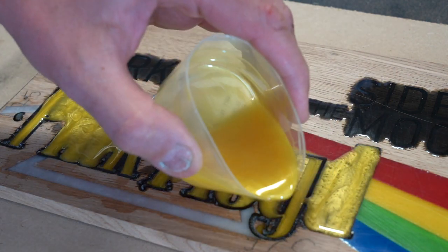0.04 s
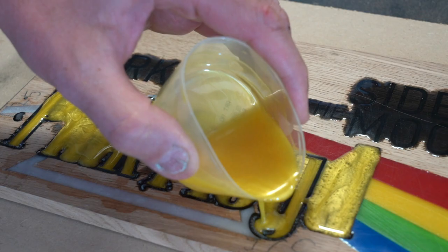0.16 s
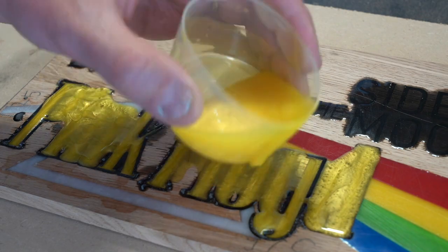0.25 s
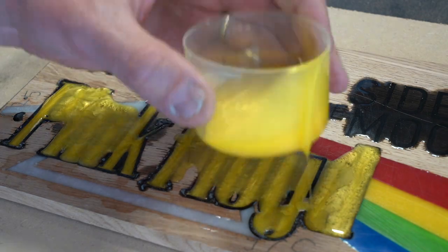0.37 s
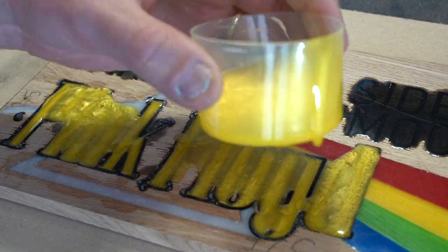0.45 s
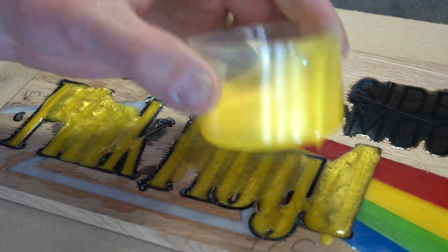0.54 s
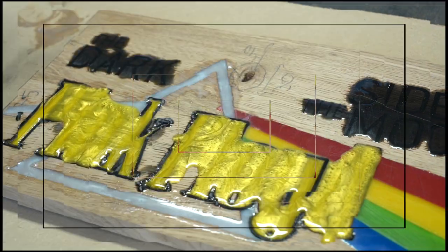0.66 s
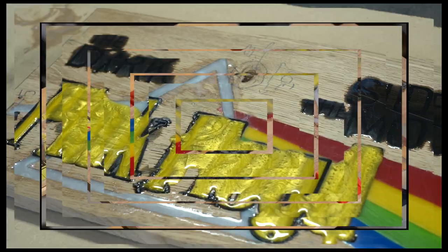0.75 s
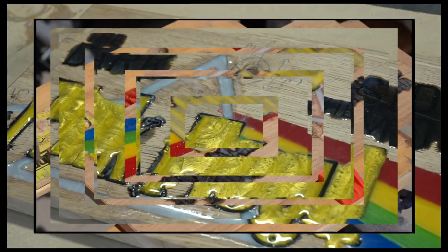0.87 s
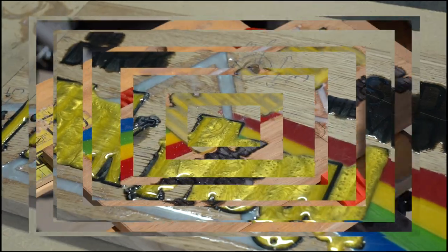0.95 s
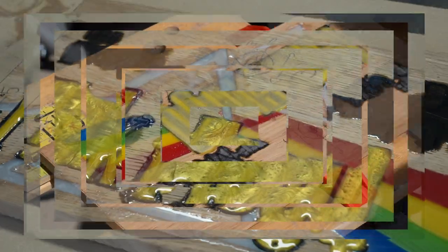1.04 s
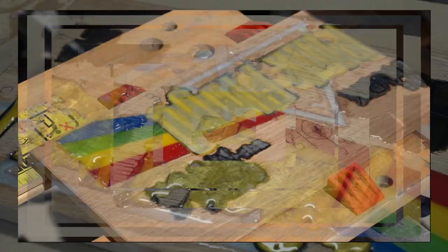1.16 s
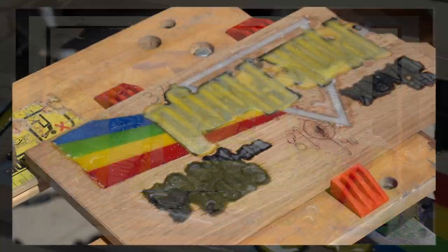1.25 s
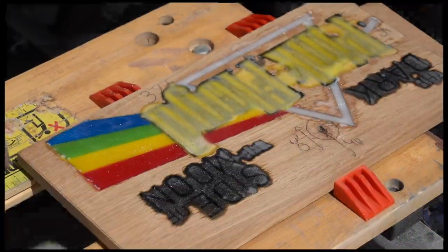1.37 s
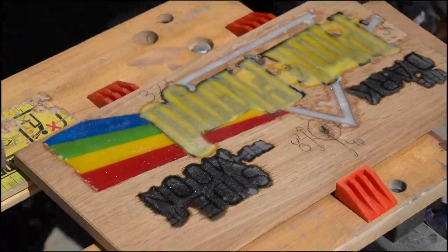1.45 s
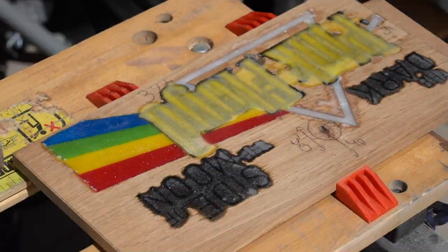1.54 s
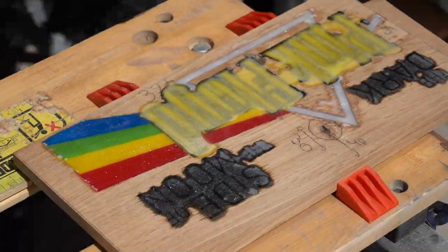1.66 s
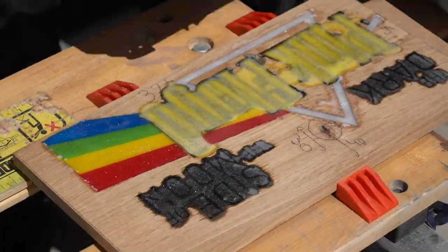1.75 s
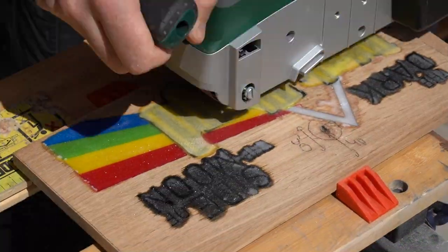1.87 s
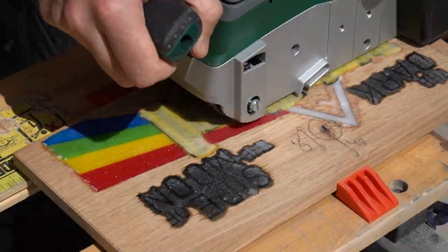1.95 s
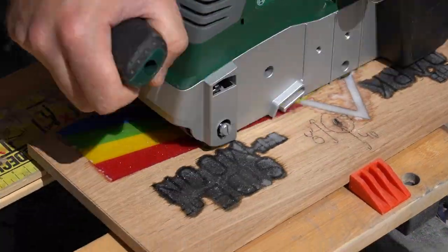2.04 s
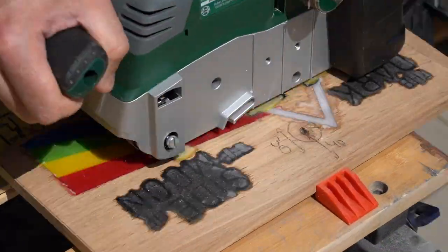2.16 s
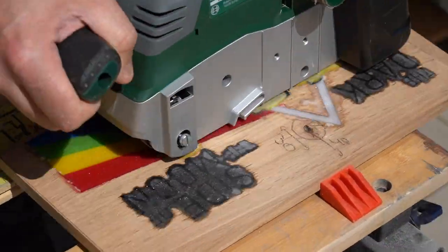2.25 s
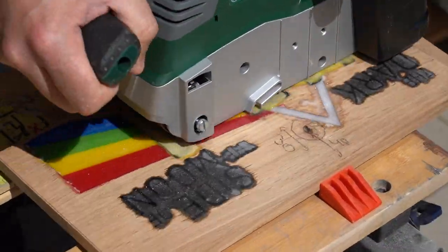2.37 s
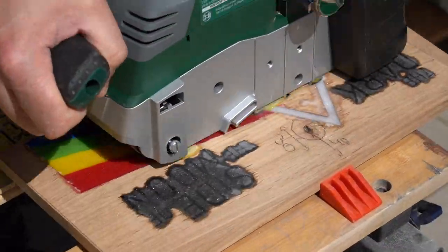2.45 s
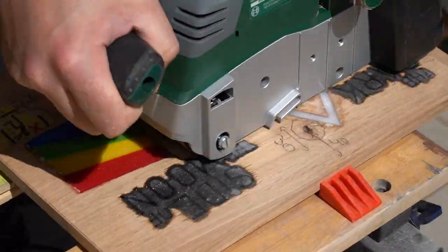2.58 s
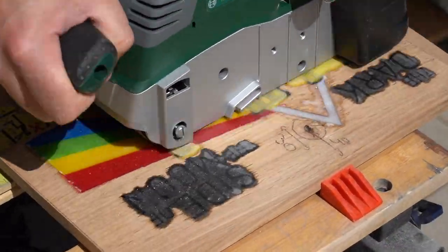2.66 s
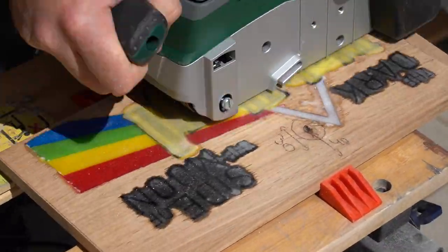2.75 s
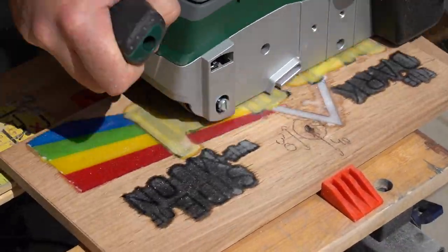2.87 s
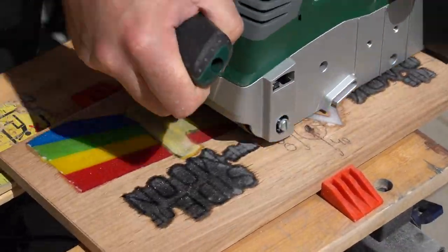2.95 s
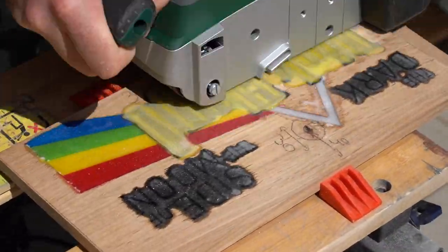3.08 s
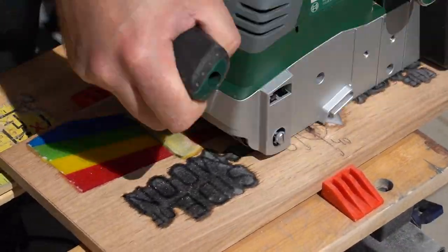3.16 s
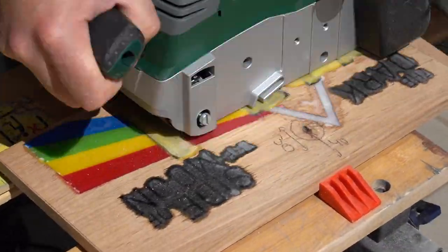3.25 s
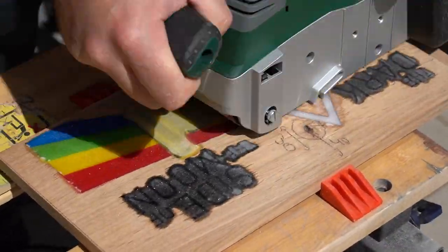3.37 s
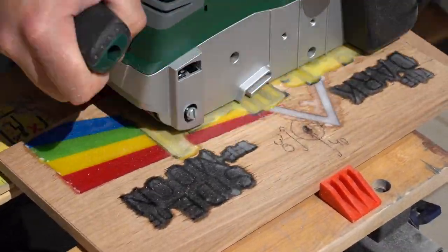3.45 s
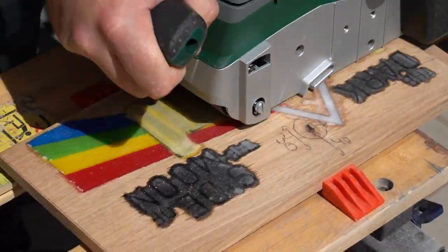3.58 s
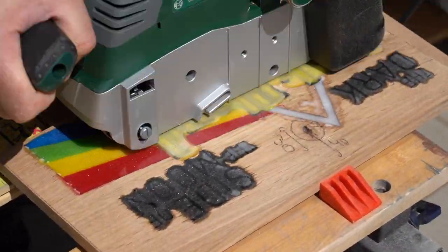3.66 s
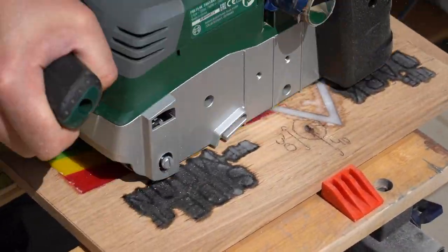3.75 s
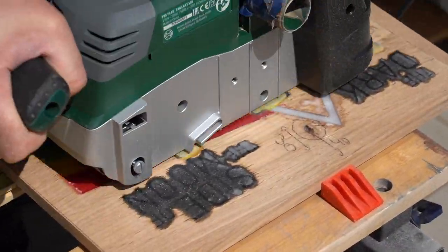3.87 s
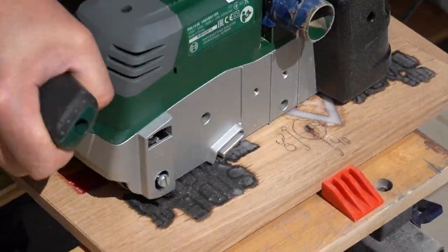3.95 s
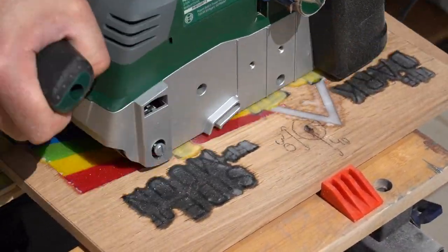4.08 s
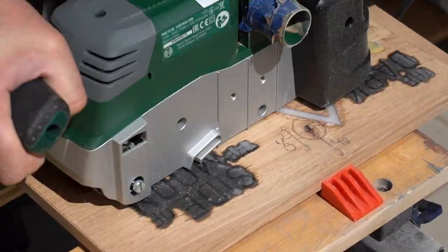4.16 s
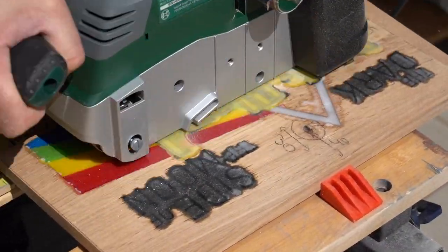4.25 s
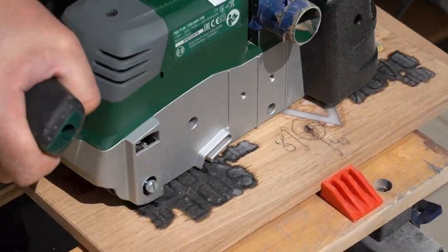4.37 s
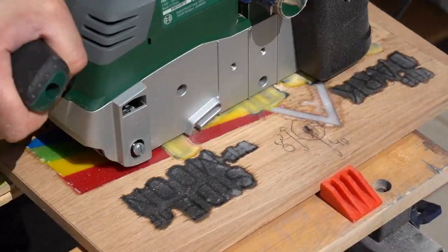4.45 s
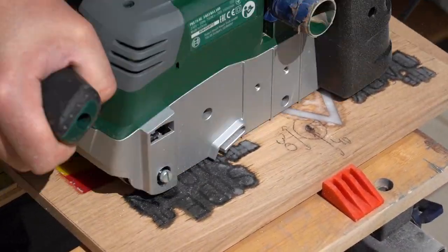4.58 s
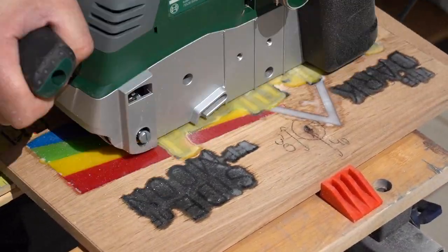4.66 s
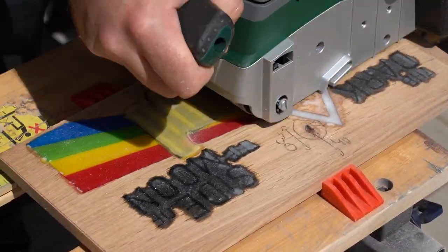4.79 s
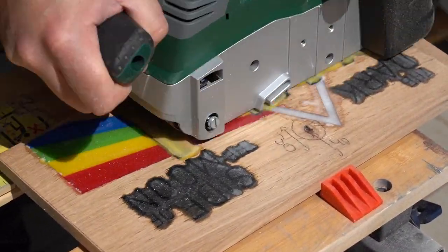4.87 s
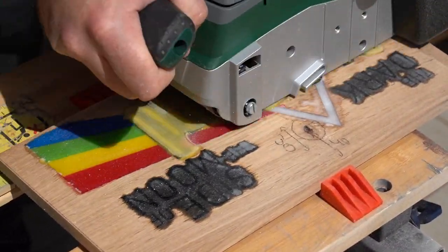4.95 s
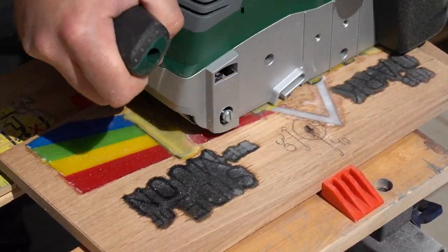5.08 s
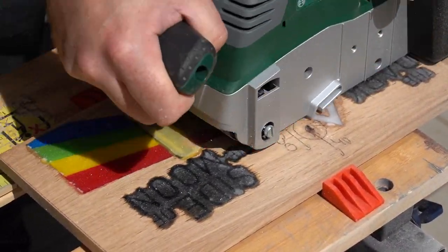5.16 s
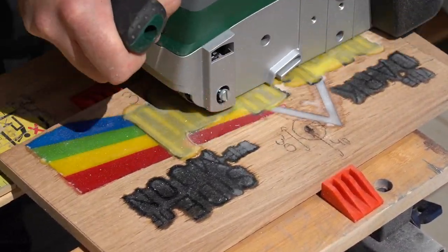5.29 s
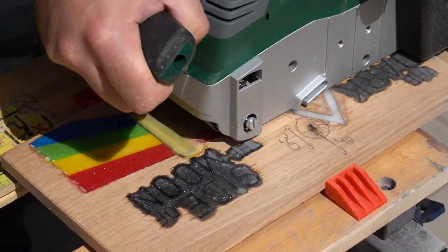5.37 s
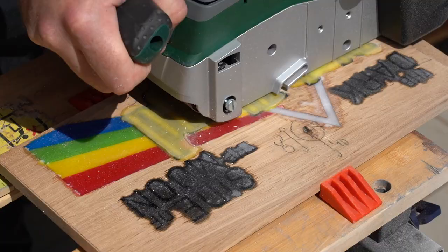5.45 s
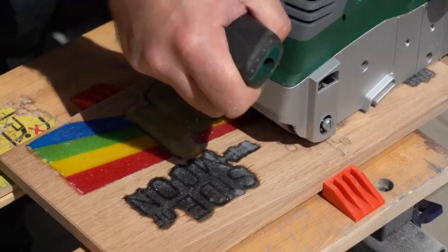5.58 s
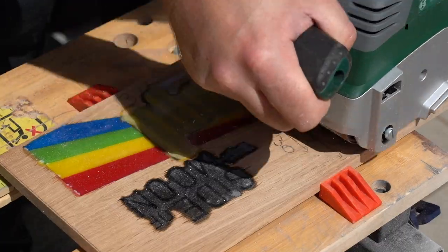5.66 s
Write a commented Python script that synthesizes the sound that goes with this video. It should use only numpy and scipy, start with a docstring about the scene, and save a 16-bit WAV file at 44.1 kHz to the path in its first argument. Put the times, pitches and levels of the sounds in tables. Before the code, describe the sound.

A fan drone with thin electric whine fades out, then a belt sander jerks to life and grinds a resin-filled board with a wavering whine.

```python
"""A belt sander spins up on a resin-filled wooden board: its fan whines as multiples of the motor's
turn rate, which sags under load, while banded noise hisses as grit on the wood.
Before it a fan drones (resonant noise) with a thin electric whine (fixed lines) and fades away;
soft bumps ring bench modes, hiss swells make short swishes and a gliding sine squeaks.
Faint air noise and a low hum lie beneath."""
import sys
import numpy as np
from scipy import signal
from scipy.io import wavfile

SR = 44100
rng = np.random.default_rng(int(sys.argv[2]) if len(sys.argv) > 2 else 0)


def dump(signal):
    """Clip the signal to [-1, 1] and save it as 16-bit WAV at the path in sys.argv[1]."""
    limited = np.clip(np.atleast_2d(signal).T, -1, 1)
    pcm = np.round(limited * 32767).astype(np.int16)
    wavfile.write(sys.argv[1], SR, pcm)


N = 252252
TIME_S = np.arange(N) / SR

# Drone air spectrum, relative: f/Hz, density/dB per Hz
DRONE_AIR = [(30, -15), (65, -5.5), (150, -10), (235, -5.5), (380, -8), (600, -11), (800, -11.5),
             (1100, -12.5), (1700, -15.5), (2300, -15), (5000, -19.5), (9500, -26), (12800, -30.5),
             (15800, -51)]
# Fan and duct resonances, two passes each: f/Hz, half of each pass's bandwidth/Hz, level re drone/dB
DUCT = [(91, 4.9, -14.5), (116.2, 3.4, -13.5), (199.3, 8.1, -20), (288, 18, -12.5), (312, 18, -9.5),
        (440, 15, -10.5), (523.5, 20, -14), (694.6, 28, -8.5), (735, 25, -12), (943, 17, -20),
        (2143, 41, -18.5), (2360, 85, -18.5)]
# Drone left-right correlation: f/Hz, likeness/1
DRONE_LIKENESS = [(60, .999), (200, 1), (350, 0.95), (600, 0.74), (950, 0.042), (1400, 0.11), (2200, -0.42),
                  (4200, -0.2), (5500, 0.062), (15000, 0)]
# Drone balance: f/Hz, left minus right/dB
DRONE_BALANCE = [(150, 0), (380, -1.5), (700, -4.5), (2400, 0), (6000, -2), (15000, -1)]
# Electric whine lines: f/Hz, relative level/dB
BUZZ = [(1200, -18), (1402, -6), (1798, -8), (1998, 1.5), (2799, -7)]
# Electric whine swells: start/s, end/s, level/dB
BUZZ_SWELLS = [(0, 0.35, -64), (.47, 0.62, -59.5)]
# Narrow hiss swells: start/s, end/s, level/dB
HISS_SWELLS = [(0.028, .105, -53), (0.447, 0.538, -56)]
# Room air spectrum, relative: f/Hz, density/dB per Hz
ROOM_AIR = [(40, -13), (150, -2), (500, -6.5), (2000, -9), (3000, -10.5), (6000, -7), (15000, -26)]
# Bumps on the bench: t/s, level/dB
KNOCKS = [(.802, -39), (.818, -40), (.849, -45.5), (1.509, -57), (1.644, -69)]
# Bench modes: f/Hz, relative level/dB, t60/s
BENCH = [(194, -8.5, 0.19), (315, -12, 0.09), (401, 2, 0.1), (494, 0, 0.063), (680, 5.5, 0.03),
         (1020, -4, 0.055), (1530, -6, 0.033), (2520, -25, .015)]
# Swish spectrum, relative: f/Hz, density/dB per Hz
SWISH = [(180, -45), (300, -3), (991, -15), (1570, -1), (1970, -3), (3790, -3.5), (6000, -7), (8880, -13),
         (15000, -20)]
# Swishes: start/s, attack/s, end/s, release/s, level/dB
SWISHES = [(1.04, .03, 1.11, .05, -65), (1.35, .03, 1.4, .02, -71), (1.514, 0.075, 1.627, 0.078, -57.5)]
# Squeak: t/s, f/Hz, level/dB
SQUEAK = [(1.677, 4800, -82), (1.684, 5200, -74), (1.692, 5500, -64), (1.718, 5560, -65),
          (1.733, 5300, -67), (1.742, 4700, -72), (1.7445, 5400, -86), (1.749, 5560, -66),
          (1.757, 5250, -67), (1.765, 4600, -76)]
# Motor run-up before the load: t/s, speed/turns per s
RUN_UP = [(1.77, 190), (1.8, 235), (1.837, 283), (1.875, 318), (1.9, 333), (1.97, 375), (2.05, 387),
          (2.09, 383), (2.12, 376), (2.16, 373), (2.21, 369)]
# Motor under the changing hand pressure: t/s, speed/turns per s
LOADED = [(2.245, 309), (2.28, 299), (2.34, 287), (2.42, 303), (2.48, 311), (2.55, 315), (2.68, 309),
          (2.82, 313), (2.9, 309), (2.99, 301), (3.17, 295), (3.27, 286), (3.42, 301), (3.62, 290),
          (3.73, 273), (3.81, 286), (3.88, 289), (4.06, 285), (4.17, 288), (4.4, 283), (4.57, 294),
          (4.69, 285), (4.8, 292), (5.0, 282), (5.12, 277), (5.31, 280), (5.5, 273), (5.72, 287)]
# Sanding noise spectrum, relative: f/Hz, density/dB per Hz
GRIT = [(40, -42), (80, -21.5), (110, -36), (170, -22), (220, -39), (300, -13.5), (500, -7.5), (1100, -5),
        (1700, -3), (3100, -2), (3700, -2.5), (7500, -6.5), (9500, -10), (15800, -17)]
# Housing and board resonances: f/Hz, bandwidth/Hz, gain/dB
HOUSING = [(327, 49, 1.5), (515, 310, -6), (1545, 340, -7.5), (2840, 690, -4.5), (5900, 2000, -28),
           (7870, 440, -14)]
# Sander left-right correlation: f/Hz, likeness/1
SANDER_LIKENESS = [(60, .999), (150, 1), (300, 1), (640, 0.98), (1400, 0.76), (3100, 0.55), (6800, 0.42),
                   (15000, 0.49)]
# Sander balance: f/Hz, left minus right/dB
SANDER_BALANCE = [(100, -0.5), (300, -1.5), (640, 0), (1400, -1), (4000, -1.3), (7500, -3.5), (15000, 1)]
# Belt briefly loses grip: t/s, 1/e half-length/s, noise dip/dB
SLIPS = [(1.845, .004, 2), (1.865, 0.003, 4), (2.216, 0.048, 2.5), (2.334, 0.072, 4), (3.264, 0.044, 1.5),
         (3.673, .04, 0.5), (5.044, 0.032, 1)]
# Drive jerks the belt into motion: t/s, 1/e half-length/s, level/dB
JERKS = [(1.775, .004, -53.5), (1.794, .004, -50), (1.805, .0035, -45), (1.8155, 0.004, -43),
         (1.827, .004, -47), (1.8372, .0035, -38.5), (1.856, 0.0048, -36.5), (1.875, 0.0055, -41),
         (1.895, .009, -45.5)]
# Rotor orders in each jerk: multiple of turn rate, relative level/dB
JERK_TONES = [(5, -16), (7, -13), (9, -10), (10, 0), (11, -10), (14, -17), (16, -17)]
# Grit crunches as the belt first drags: t/s, 1/e half-length/s, level/dB
CRUNCHES = [(1.83, 0.022, -59), (1.95, 0.046, -53), (2.1, 0.13, -57.5), (2.2, .05, -56)]
# Belt catches, board rasps louder: t/s, 1/e half-length/s, level/dB
CATCHES = [(2.36, 0.11, -50.5), (3.175, 0.02, -45.5), (3.78, 0.039, -49), (4.2, 0.26, -55.5),
           (4.675, 0.017, -50.5)]
# Dull board thumps: t/s, 1/e half-length/s, level/dB
THUMPS = [(2.88, 0.02, -69), (2.97, 0.036, -72), (3.13, 0.021, -69), (3.9, 0.049, -67), (4.15, 0.1, -70),
          (4.38, 0.024, -73)]
# Blade tone before throb: t/s, level/dB
BLADE_LEVEL = [(2.2, -75), (2.27, -54), (2.37, -61), (2.44, -50), (2.53, -46.5), (2.65, -44.5), (2.74, -52),
               (2.81, -51), (2.92, -45), (3.25, -45.5), (3.35, -47.5), (3.53, -45), (3.8, -45.5),
               (4.1, -48.5), (4.33, -49), (4.52, -46.5), (5.1, -45), (5.4, -47.5), (5.72, -48.5)]
# Blade octave before throb, sings out as the belt bites: t/s, level/dB
OCTAVE_LEVEL = [(2.22, -82), (2.265, -45.5), (2.335, -46), (2.36, -62), (2.42, -46.5), (2.6, -47),
                (2.67, -42.5), (2.82, -44.5), (2.92, -49), (3.06, -44.5), (3.26, -49.5), (3.46, -43),
                (3.7, -50), (3.82, -48), (4.15, -49), (4.28, -52.5), (4.6, -46.5), (4.72, -48),
                (4.82, -45.5), (4.97, -45.5), (5.08, -51), (5.2, -48), (5.33, -51), (5.52, -48.5),
                (5.64, -43.5), (5.72, -51)]
# Rotor hum: t/s, level/dB
HUM_LEVEL = [(2.2, -75), (2.27, -61), (2.37, -78), (2.48, -59), (2.72, -63.5), (3.05, -68), (3.25, -70),
             (3.35, -64), (3.55, -61.5), (3.7, -75.5), (4.6, -70), (5.72, -79)]
# Weaker tones under load: multiple of turn rate, entry/s, base level/dB,
# slope/dB per % of extra speed, flutter/1
MOTOR_TONES = [(5, 2.37, -63.5, .5, 0.57), (6, 2.37, -58.5, .5, 0.42), (8, 2.4, -58.5, 0, 0.48),
               (9, 2.4, -64.5, 0.85, 0.9), (10, 2.9, -56.5, -0.26, 0.52), (11, 3.72, -54.5, -0.1, 0.35),
               (21, 2.36, -53.5, 0, 0.6), (27, 3.7, -62.5, -1, 1.1), (28, 3.2, -62.5, -0.5, 1)]
# Single motor tones swell or sink for a moment: multiple of turn rate, t/s, 1/e half-length/s, change/dB
TONE_SWELLS = [(9, 2.5, .08, 4), (6, 4.53, 0.12, 3.5), (11, 4.92, 0.1, -12), (8, 4.4, 0.16, 8),
               (6, 5.4, .3, -7), (10, 5.45, 0.2, 6), (11, 5.5, 0.043, 4.5)]

BLADES = 7
ROLLER_RATIO = 0.156   # belt roller turns per motor turn
WORKING_SPEED_TURNS_PER_S = 290
TRIGGER_S, TRIGGER_RISE_S = 1.7695, 0.003
SETTLED_S, SETTLE_S = 2.37, 0.068   # belt settles on the board and begins to tug
DRONE_DB, DRONE_FADE_S, DRONE_GONE_S, DRONE_FADE_POWER = -41.5, 0.78, 1.516, 1.25
BUZZ_REST_DB, BUZZ_RAMP_S = -68.5, 0.02
# Abrasion layers: level/dB at working speed, slope/dB per % of extra speed, build-up/s
BOARD_RASP = (-42, 0.059, 0.051)
GRIT_SCRAPE = (-43, 0.026, 0.017)
DUST_HISS = (-41.5, 0.064, 0.085)
SCRAPE_DIP_SHARE = 0.36   # midrange dips less than rasp and hiss
FREE_BLADE_DB, FREE_HOARSE_DB, FREE_OCTAVE_DB, FREE_HUM_DB = -48, -49, -50, -58.5
JERK_SHUDDER_RAD, FREE_SHUDDER_RAD = 0.04, 0.035   # rotor angle wobble
BLADE_THROB, OCTAVE_THROB = 0.3, 0.19   # depth, about once per roller turn
TONE_WANDER_DB, TONE_WANDER_HZ = 0.8, 4
VENT_HZ, VENT_HALF_WIDTH_HZ, VENT_DB = 2983, 76, 5   # housing resonance lifting the weaker tones
PUSH_S, PUSH_HALF_S, PUSH_TONES_DB = 4.2, 0.87, 2   # pushed far forward, weaker tones stand out
CUTOFF_HZ = 15900


def from_db(db):
    """Decibels to gain."""
    return 10 ** (np.asarray(db) / 20)


def rms_one(x):
    """Scale to unit power."""
    return x / np.sqrt(np.mean(x ** 2) + 1e-20)


def in_time(rows):
    """Each column of a timed table at every sample."""
    t_s, *columns = np.transpose(rows)
    return [np.interp(TIME_S, t_s, column) for column in columns]


def at_hz(points, hz):
    """Read a spectrum on a log-frequency axis."""
    points = np.array(points)
    return np.interp(np.log(hz), np.log(points[:, 0]), points[:, 1])


def swell(start_s, attack_s, end_s, release_s):
    """Straight attack, hold until the end, straight release."""
    attack = np.clip((TIME_S - start_s) / attack_s, 0, 1)
    return attack * np.clip(1 - (TIME_S - end_s) / release_s, 0, 1)


def bump(t_s, half_s):
    """Gaussian rise and fall around a moment."""
    return np.exp(-((TIME_S - t_s) / half_s) ** 2)


def bursts(rows):
    """Summed level of a row of short bursts."""
    return sum(from_db(db) * bump(t_s, half_s) for t_s, half_s, db in rows)


def drift(rate_hz):
    """Random curve of RMS 1: noise through a double real pole at a low rate."""
    step = 20   # samples per drift point
    warm_up = 4000
    pole = np.exp(-2 * np.pi * rate_hz * step / SR)
    white = rng.standard_normal(N // step + 2 + warm_up)
    slow = signal.lfilter([1], [1, -2 * pole, pole * pole], white)[warm_up:]
    return np.interp(np.arange(N) / step, np.arange(len(slow)), rms_one(slow))


def resonate(x, hz, width_hz):
    """Two-pole resonance with gain 1 on top."""
    r = np.exp(-np.pi * width_hz / SR)
    numerator = np.array([1, 0, -1]) * (1 - r * r) / 2
    return signal.lfilter(numerator, [1, -2 * r * np.cos(2 * np.pi * hz / SR), r * r], x)


def resonate_twice(x, hz, width_hz):
    """Two equal resonances in series: steeper skirts."""
    return resonate(resonate(x, hz, width_hz), hz, width_hz)


def angle(hz):
    """Running phase of a changing rate."""
    return 2 * np.pi * np.cumsum(hz) / SR


def spread(pair, hz, likeness, balance):
    """Mix two unrelated signals into partly alike left and right."""
    alike = np.clip(at_hz(likeness, hz), -0.9, 0.999)
    sides = np.array([[1], [-1]])
    stereo = np.sqrt(1 + alike) * pair[0] + np.sqrt(1 - alike) * pair[1] * sides
    return stereo * from_db(sides * at_hz(balance, hz) / 2)


def noise_bands(spectrum, likeness, balance, count):
    """Stereo noise as (Hz, band) pairs, band powers summing to 1."""
    edges_hz = np.geomspace(30, 17000, count + 1)
    white = rng.standard_normal((2, 2, N))   # neighbouring bands use different noise
    bands = []
    for k, (low_hz, high_hz) in enumerate(zip(edges_hz, edges_hz[1:])):
        hz = np.sqrt(low_hz * high_hz)
        band_pass = signal.butter(2, [low_hz, high_hz], "band", fs=SR, output="sos")
        pair = signal.sosfilt(band_pass, white[k % 2])
        bands.append((hz, from_db(at_hz(spectrum, hz)) * spread(pair, hz, likeness, balance)))
    total = np.sqrt(sum(np.mean(band ** 2) for hz, band in bands))
    return [(hz, band / total) for hz, band in bands]


def noise(spectrum, likeness, balance, count):
    """Steady coloured stereo noise."""
    return sum(band for hz, band in noise_bands(spectrum, likeness, balance, count))


def tone(phase, flutter, scatter, flutter_hz=55):
    """Fluttering line; an opposed left-right part of wandering phase widens it."""
    phase = phase + rng.uniform(0, 2 * np.pi)
    cos, sin = np.cos(phase), np.sin(phase)
    mid = cos + flutter * (drift(flutter_hz) * cos + drift(flutter_hz) * sin)
    side = scatter * np.sin(phase + 1.07 * drift(7.0))
    return rms_one(mid) + side * np.array([[1], [-1]])


def drone():
    """Moving air rumbles in narrow resonances, with a fine hiss above."""
    out = from_db(-3.0) * noise(DRONE_AIR, DRONE_LIKENESS, DRONE_BALANCE, count=24)
    for hz, half_width_hz, db in DUCT:
        pair = resonate_twice(rng.standard_normal((2, N)), hz, 2 * half_width_hz)
        out += from_db(db) * rms_one(spread(pair, hz, DRONE_LIKENESS, DRONE_BALANCE))
    top_hiss = resonate_twice(rng.standard_normal((2, N)), hz=15300, width_hz=1800)
    return from_db(DRONE_DB) * (out + from_db(-14.0) * rms_one(top_hiss))


def buzz():
    """Faint electric whine of fixed lines and a narrow hiss; each swells twice."""
    whine_level, hiss_level = (
        sum(from_db(db) * swell(start_s, BUZZ_RAMP_S, end_s, BUZZ_RAMP_S) for start_s, end_s, db in rows)
        for rows in (BUZZ_SWELLS, HISS_SWELLS))
    lines = sum(from_db(db) * tone(2 * np.pi * hz * TIME_S, flutter=0.12, scatter=1.4)
                for hz, db in BUZZ)
    hiss = resonate_twice(rng.standard_normal((2, N)), hz=3190, width_hz=320)
    return (from_db(BUZZ_REST_DB) + whine_level) * lines + hiss_level * rms_one(hiss)


def drone_fade():
    """Gain that holds, then fades to nothing."""
    remaining = np.clip((DRONE_GONE_S - TIME_S) / (DRONE_GONE_S - DRONE_FADE_S), 0, 1)
    return remaining ** DRONE_FADE_POWER


def room_tone():
    """Faint air noise and a low sine hum that recedes."""
    hum_db = np.interp(TIME_S, [1.8, 1.95], [-75, -90])
    hum = from_db(hum_db) * np.sin(2 * np.pi * 68 * TIME_S)
    return from_db(-70.0) * noise(ROOM_AIR, SANDER_LIKENESS, SANDER_BALANCE, count=6) + hum


def knocks():
    """Each bump starts with a short crack and sets decaying bench modes ringing."""
    out = np.zeros(N)
    age_s = np.arange(SR // 4) / SR
    for t_s, db in KNOCKS:
        ring = sum(from_db(mode_db) * np.sin(2 * np.pi * hz * age_s) * np.exp(-np.log(1000) * age_s / t60_s)
                   for hz, mode_db, t60_s in BENCH)
        crack = rms_one(resonate(rng.standard_normal(len(age_s)), hz=1500, width_hz=2200))
        crack = crack * np.exp(-age_s / 0.0039)
        start = int(t_s * SR)
        out[start:start + len(age_s)] += from_db(db) * (ring + from_db(-10) * crack)
    return out


def swish_and_squeak():
    """Soft swells of hiss; a thin sine of unsteady pitch squeaks as the last fades."""
    level = sum(from_db(db) * swell(*shape) for *shape, db in SWISHES)
    hz, squeak_db = in_time(SQUEAK)
    sounding = (TIME_S > SQUEAK[0][0]) * (TIME_S < SQUEAK[-1][0])
    squeak = from_db(squeak_db) * np.sin(angle(hz * (1 + 0.016 * drift(300)))) * sounding
    return level * noise(SWISH, SANDER_LIKENESS, SANDER_BALANCE, count=10) + squeak


def abrasion_db(layer, extra_speed_percent):
    """A sanding layer builds up after the trigger and follows the belt's speed."""
    db, db_per_percent, build_s = layer
    built = 1 - np.exp(-np.maximum(TIME_S - TRIGGER_S, 1 / SR) / build_s)
    return db + db_per_percent * extra_speed_percent + 20 * np.log10(built)


def belt(turn, roller, extra_speed_percent):
    """Grit tears over the board, throbbing with roller and rotor and ringing the housing."""
    dip_db = sum(db * bump(t_s, half_s) for t_s, half_s, db in SLIPS)
    rasp_db = abrasion_db(BOARD_RASP, extra_speed_percent) - dip_db
    scrape_db = abrasion_db(GRIT_SCRAPE, extra_speed_percent) - SCRAPE_DIP_SHARE * dip_db
    hiss_db = abrasion_db(DUST_HISS, extra_speed_percent) - dip_db
    out = 0
    for hz, band in noise_bands(GRIT, SANDER_LIKENESS, SANDER_BALANCE, count=24):
        # crossfade of the three layers over frequency
        low = at_hz([(700, 1), (1600, 0)], hz)
        high = at_hz([(3000, 0), (6500, 1)], hz)
        level_db = low * rasp_db + (1 - low - high) * scrape_db + high * hiss_db
        out = out + band * from_db(level_db + 1.06 * drift(9.2))
    out = out + sum(from_db(db) * resonate(out, hz, width_hz) for hz, width_hz, db in HOUSING)
    throb_db = 0.35 * np.sin(roller) + 0.5 * np.sin(turn)
    return out * from_db(throb_db + 0.16 * drift(190) + 0.42 * drift(9.2))


def spin_up(turn):
    """Drive jerks the belt: a stuttering cluster of rotor orders climbs with the speed."""
    turn = turn + JERK_SHUDDER_RAD * drift(260)
    cluster = sum(from_db(db) * tone(multiple * turn, flutter=0.4, scatter=0.5, flutter_hz=260)
                  for multiple, db in JERK_TONES)
    return bursts(JERKS) * cluster


def board_noise(rows, hz, width_hz):
    """Bursts of friction noise in one resonance of the board."""
    return bursts(rows) * rms_one(resonate_twice(rng.standard_normal(N), hz, width_hz))


def free_whine(turn):
    """Without load the rotor's angle shudders and the fan whines hoarsely."""
    turn = turn + FREE_SHUDDER_RAD * (drift(31) + drift(95))
    blade = BLADES * turn
    whine = from_db(FREE_BLADE_DB) * tone(blade, flutter=0.74, scatter=0.5)
    whine += from_db(FREE_HOARSE_DB) * tone(blade, flutter=3.9, scatter=0.27, flutter_hz=360)
    whine += from_db(FREE_HUM_DB) * tone(turn, flutter=0.11, scatter=0.03)
    octave = from_db(FREE_OCTAVE_DB) * tone(2 * blade, flutter=0.55, scatter=0.82, flutter_hz=130)
    return (swell(start_s=1.92, attack_s=0.06, end_s=2.135, release_s=0.11) * whine
            + swell(start_s=1.925, attack_s=0.06, end_s=2.16, release_s=0.03) * octave)


def motor(speed, turn, roller, extra_speed_percent):
    """Blade tones and rotor orders follow the speed; the settled belt tugs once per roller turn."""
    settled = np.clip((TIME_S - SETTLED_S) / SETTLE_S, 0, 1)
    tug_rad = 0.033 * np.sin(roller) * (1 + 0.99 * drift(5.3)) + 0.032 * drift(27)
    turn = turn + settled * tug_rad
    throb = roller + 1.5 * drift(2.9)
    (blade_db,), (octave_db,), (hum_db,) = map(in_time, (BLADE_LEVEL, OCTAVE_LEVEL, HUM_LEVEL))

    out = from_db(hum_db) * tone(turn, flutter=0.36, scatter=0.023, flutter_hz=20)
    blade_gain = from_db(blade_db) * (1 + BLADE_THROB * np.sin(throb))
    out += blade_gain * tone(BLADES * turn, flutter=0.48, scatter=0.92, flutter_hz=67)
    pulsing = 1 + settled * (OCTAVE_THROB * np.sin(throb) + 0.17 * np.sin(2 * throb + drift(18)))
    out += from_db(octave_db) * pulsing * tone(2 * BLADES * turn, flutter=0.44 * settled, scatter=1.0)

    for order, enters_s, db, db_per_percent, flutter in MOTOR_TONES:
        vent_db = VENT_DB * np.exp(-((order * speed - VENT_HZ) / VENT_HALF_WIDTH_HZ) ** 2)
        push_db = PUSH_TONES_DB * bump(PUSH_S, PUSH_HALF_S)
        swell_db = sum(change_db * bump(t_s, half_s)
                       for which, t_s, half_s, change_db in TONE_SWELLS if which == order)
        wander_db = TONE_WANDER_DB * drift(TONE_WANDER_HZ)
        level_db = db + db_per_percent * extra_speed_percent + vent_db + push_db + swell_db + wander_db
        entered = np.clip((TIME_S - enters_s) / SETTLE_S, 0, 1)
        out += entered * from_db(level_db) * tone(order * turn, flutter, scatter=0.38, flutter_hz=3 * order)
    return out


def sander():
    """One motor speed drives fan and belt from the moment the trigger is pulled."""
    speed, = in_time(RUN_UP + LOADED)
    extra_speed_percent = 100 * (speed / WORKING_SPEED_TURNS_PER_S - 1)
    turn = angle(speed)
    roller = ROLLER_RATIO * turn
    sanding = belt(turn, roller, extra_speed_percent)
    whine = spin_up(turn) + free_whine(turn) + motor(speed, turn, roller, extra_speed_percent)
    board = board_noise(CRUNCHES, hz=990, width_hz=560)
    board += board_noise(CATCHES, hz=1510, width_hz=360)
    board += board_noise(THUMPS, hz=110, width_hz=120)
    running = np.clip((TIME_S - TRIGGER_S) / TRIGGER_RISE_S, 0, 1)
    return running * (whine + sanding + board)


def scene():
    """Sum of all sources."""
    return drone_fade() * (drone() + buzz()) + room_tone() + knocks() + swish_and_squeak() + sander()


def record(dry):
    """Steep elliptic low-pass cuts the top."""
    low_pass = signal.ellip(12, 0.2, 80, CUTOFF_HZ, fs=SR, output="sos")   # ripple, stopband in dB
    return signal.sosfilt(low_pass, dry)


dry = scene()
out = record(dry)
dump(out)
```